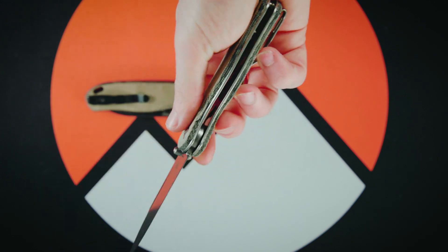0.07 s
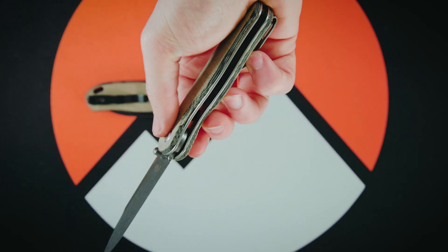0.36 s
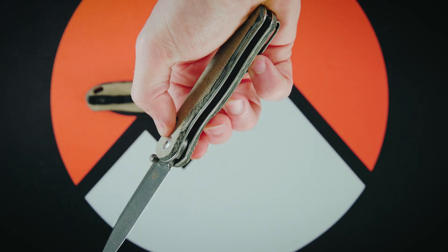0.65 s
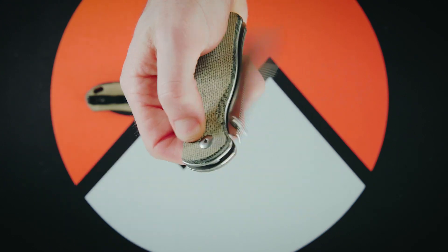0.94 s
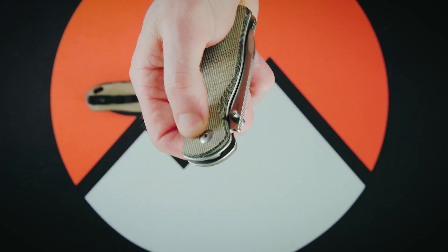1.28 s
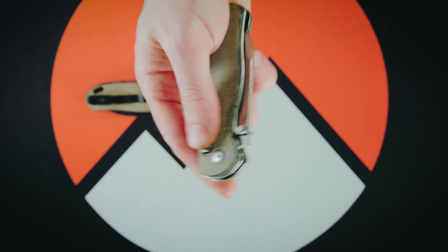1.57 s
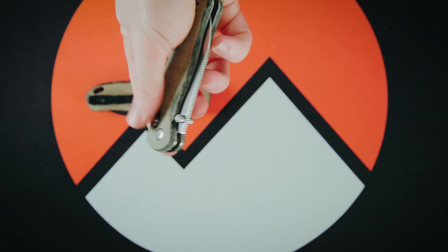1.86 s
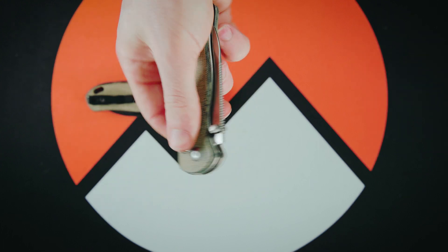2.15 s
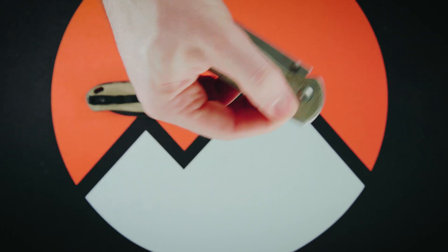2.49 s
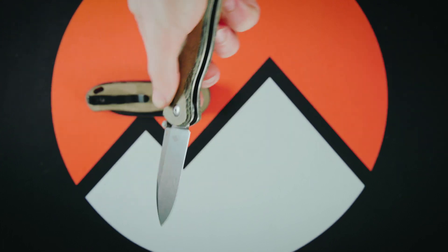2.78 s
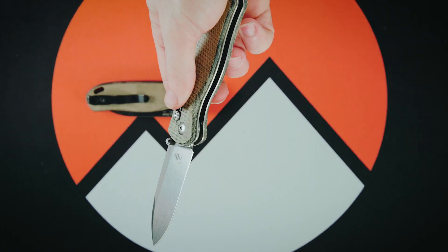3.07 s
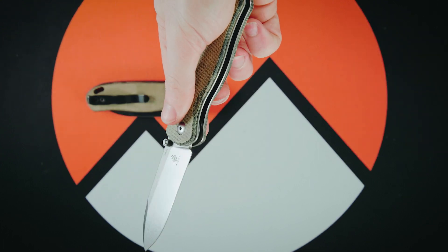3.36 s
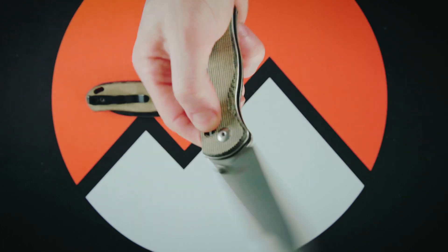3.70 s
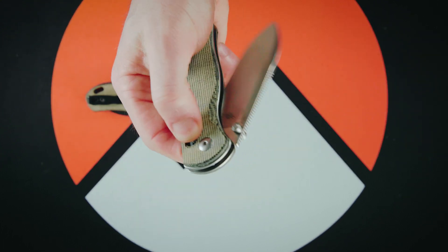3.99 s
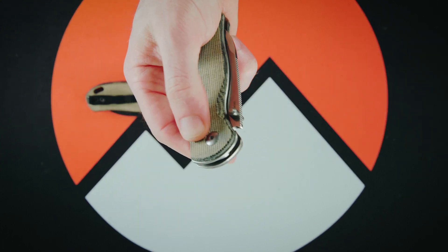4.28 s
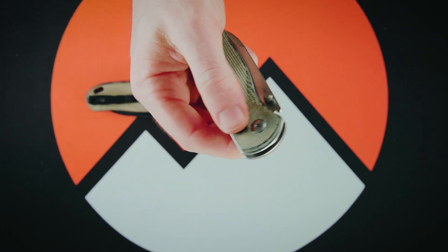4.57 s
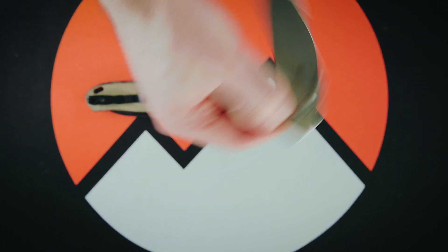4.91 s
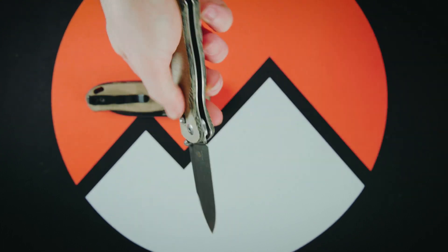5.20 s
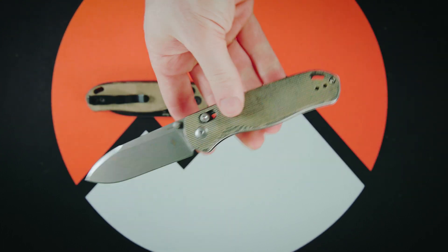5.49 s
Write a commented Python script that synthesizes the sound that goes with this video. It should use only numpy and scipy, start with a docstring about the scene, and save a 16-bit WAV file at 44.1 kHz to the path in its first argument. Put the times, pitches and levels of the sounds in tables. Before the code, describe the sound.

A folding knife is twice swung shut with rattling steel clicks and flicked open with a sharp snap, close up in a small room.

```python
"""A small, live room with ventilation humming; a folding knife is worked over a desk, close to the mic.
Twice the lock bar is pulled back, the blade swings shut and rattles in the handle, then it is flicked open
and snaps against its stop pin, bouncing. Each contact is a few ms of steel chatter, coloured by the
knife's resonances. Fingers rub the grip and the pivot squeaks faintly. The desk returns one early
reflection, the room a short tail, and the hardest snaps overload the microphone input."""
import sys
import numpy as np
from scipy import signal
from scipy.fft import rfft, irfft
from scipy.io import wavfile
from scipy.ndimage import uniform_filter1d

SR = 44100
rng = np.random.default_rng(int(sys.argv[2]) if len(sys.argv) > 2 else 0)


def store_wav(level_fs):
    """Save 16-bit WAV to argv[1]."""
    pcm = np.round(np.clip(np.atleast_2d(level_fs), -1, 1) * 32767)
    wavfile.write(sys.argv[1], SR, pcm.T.astype(np.int16))


N = 249165

# spectrum of the ventilation's air noise: frequency_hz, relative_db
AIR_COLOUR = [(15, -66.5), (25, -38.5), (43, -17), (55, -5), (76, -3), (97, -15), (137, -5), (170, -17),
              (326, -17), (373, -29.5), (416, -17.5), (451, -24), (2840, -39), (7510, -38), (16000, -45)]
# ventilation drones: pitch_hz, width_hz, level_db
VENT_DRONES = [(71.73, 3.3, -55), (121.4, 7, -63), (268, 36, -63.5), (335.2, 18, -66.5)]
# colour of the reverberation against the direct sound: frequency_hz, gain_db
REVERB_COLOUR = [(200, -6), (1000, 5), (2500, 1), (4700, 2.5), (6500, -2), (8500, -3.5), (12000, -0.5),
                 (15000, 0.5)]
# decay of the room: frequency_hz, t60_s
REVERB_DECAY = [(200, 0.47), (800, 0.8), (2100, 0.57), (4700, 0.64), (6600, 0.59), (9000, 0.47),
                (15000, .4)]
# skin on the grip and lock bar: start_s, length_s, level_db
FINGER_RUBS = [(0, 0.048, -63.5), (1.279, 0.027, -44), (1.684, 0.094, -62.5), (2.064, 0.16, -64),
               (2.474, 0.043, -45.5), (3.526, 0.13, -59), (4.764, .035, -59.5), (4.792, 0.0287, -50.5),
               (5.482, 0.021, -61), (5.573, 0.062, -64)]
# spectrum of rubbing: frequency_hz, relative_db
FRICTION_COLOUR = [(200, -19), (1000, -8.5), (2500, -8.5), (5000, 0.5), (7500, -0.5), (11000, -6),
                   (16000, -22)]
# the pivot starts to turn: start_s, length_s, pitch_hz, width_hz, level_db
PIVOT_SQUEAKS = [(2.61, 0.024, 5700, 354, -69), (3.542, 0.052, 4850, 600, -60.5),
                 (3.637, 0.038, 2250, 111, -62)]
# the handle jolts in the palm: start_s, level_db, pitch_hz, t60_s
HANDLE_JOLTS = [(.9490, -31, 136, 0.036), (1.322, -38, 300, 0.0096), (2.6403, -14.5, 733, 0.0067),
                (4.888, -51, 1000, 0.015), (4.985, -31, 1060, 0.013)]
# broad colour of a steel contact: frequency_hz, gain_db
STEEL_COLOUR = [(150, -22.5), (500, -23.5), (1200, -18.5), (2200, -14), (3400, -10.5), (5000, -9),
                (7500, -2), (10000, -8), (13000, -17.5), (15500, -24.5)]
# resonances of the folded knife: pitch_hz, width_hz, mic_lift_db, room_lift_db
FOLDED_RESONANCES = [(2750, 970, 3.5, 4.5), (4395, 590.0, 4.5, 5), (6280, 750, 4, 0.5),
                     (7680.0, 510, 2.5, -4.5), (9530, 920.0, 0.5, 2), (11000, 870.0, 4.5, 5),
                     (14670, 540.0, 5, 5.5)]
# resonances of the open knife: pitch_hz, width_hz, mic_lift_db, room_lift_db
OPEN_RESONANCES = [(2266, 890, 4.5, 6), (4613, 590, 8.5, 7.5), (6210, 1100, 6, 7), (7470, 630, 3.5, 6),
                   (9270, 500, 6, 1.5), (12080, 1200, 11.5, 7), (14650, 750, 14, -2)]
# light touches of nail and thumb stud: start_s, strength_db, tilt_db_per_octave
NAIL_TICKS = [(0.2032, -24, -10.5), (0.268, -21.5, -6), (1.664, -20, 1), (2.448, -20, 0),
              (2.4735, -11, 0.5), (2.5049, -9.5, -2.5), (3.5496, -20, -5.5), (3.643, -21, -2),
              (4.8225, -11.5, -5), (4.8876, -14.5, -9), (4.943, -21.5, 3.5), (4.979, -9, -2)]
# the lock bar slips over the tang: start_s, strength_db
LOCK_PINGS = [(1.2733, -14.5), (1.289, -14), (4.1857, -16), (4.202, -9.5), (4.212, -10)]
# the loose blade hits lock and handle: start_s, strength_db, knock_db, edge_db, ring_hz, ring_db
BLADE_RATTLES = [(0.9474, 14, -3.5, -2, 9000, 9), (1.0514, 3, 4, -1.5, 4400, 8),
                 (1.087, -6.5, 6.5, -11, 5600, 12), (1.2924, 8, -8.5, -16, 4460, 3.5),
                 (1.3119, 10.5, -6.5, -8.5, 7660, 4), (3.8493, 12.5, -1.5, 1, 8950, 4.5),
                 (4.0502, 9, 0.5, -2, 6100, 10), (4.1345, -5.5, 10.5, 4, 6200, 5),
                 (4.215, 9.5, -2, 7, 7000, 7), (4.816, -4, 0.5, -4, 6460, 7)]
# the lock bar is pulled back, later seats: start_s, strength_db, knock_db, edge_db, ring_db, room_db
LOCK_CLICKS = [(0.4303, 17, -13, -11.5, -17.5, -10.5), (2.7561, 15.5, 2.5, -2.5, 11.5, -17)]
# the blade hits its stop pin: start_s, strength_db, first_bounce_gap_s, knock_db, ring_hz, ring_db
BLADE_SNAPS = [(2.641, 25, .011, 0, 7000, 3), (4.9833, 23, .0121, 1, 6660, 4.5)]

BLADE_HZ, BLADE_WIDTH_HZ = 6700, 1700   # the band in which the blade itself rings
TOP_HZ = 15800


def from_db(db):
    """Decibels to gain."""
    return 10 ** (np.asarray(db) / 20)


def at_hz(points, hz):
    """Read a table on a log-frequency axis."""
    table_hz, value = np.transpose(points)
    return np.interp(np.log(np.maximum(hz, 1)), np.log(table_hz), value)


def bins(size):
    """Frequencies of a spectrum of that many samples."""
    return np.fft.rfftfreq(size, 1 / SR)


def bell(hz, centre, width):
    """Resonance curve of height 1."""
    return 1 / (1 + (2 * (hz - centre) / width) ** 2)


def cluster(hz, centre, width):
    """Several close modes merge into a flat-topped hump of height 1."""
    return 1 / (1 + (2 * (hz - centre) / width) ** 4)


def coloured(x, gain):
    """Shape the spectrum of x and scale it to rms 1."""
    shaped = irfft(rfft(x) * gain, len(x))
    return shaped / np.sqrt(np.mean(shaped ** 2) + 1e-20)


def minimum_phase(colour_db):
    """Causal response with that colour: nothing rings before the blow."""
    cepstrum = irfft(np.log(from_db(colour_db)))
    half = len(cepstrum) // 2
    cepstrum[1:half] *= 2
    cepstrum[half + 1:] = 0
    return np.exp(rfft(cepstrum))


def add(track, start_s, sound):
    """Mix a sound in at a time."""
    at = max(round(start_s * SR), 0)
    track[at:at + len(sound)] += sound[:max(N - at, 0)]


def ventilation(air_db=-53.5, low_cut_hz=25):
    """Room tone: soft air noise with a few narrow, wavering drones."""
    hz = bins(N)
    low_cut = hz ** 2 / np.hypot(hz ** 2, low_cut_hz ** 2)
    out = from_db(air_db) * coloured(rng.standard_normal(N), low_cut * from_db(at_hz(AIR_COLOUR, hz)))
    for pitch_hz, width_hz, db in VENT_DRONES:
        out += from_db(db) * coloured(rng.standard_normal(N), low_cut * bell(hz, pitch_hz, width_hz))
    return out


def room(x, gap_s=0.0074, build_s=0.011, size=40000, bands=18):
    """Diffuse reflections build up after a short gap and die away, the high treble first."""
    t, hz = np.arange(size) / SR, bins(size)
    spectrum = rfft(rng.standard_normal(size)) * from_db(at_hz(REVERB_COLOUR, hz))
    build = 1 - np.exp(-np.maximum(t - gap_s, 0) / build_s)
    centres, tail = np.geomspace(200, TOP_HZ, bands), 0
    for centre, share in zip(centres, np.eye(bands)):
        band = irfft(spectrum * np.interp(hz, centres, share))
        fade = build * from_db(-60 * t / at_hz(REVERB_DECAY, centre))
        tail += band * fade / np.linalg.norm(fade)
    return signal.fftconvolve(x, tail)[:N]


def desk(x, delay_s=0.0087, gain_db=-15.5):
    """The hard desk top sends one early reflection to the mic."""
    out = np.zeros(N)
    add(out, delay_s, from_db(gain_db) * x)
    return out


def friction(slips_per_s=2500, spread_db=3.5, swing_s=0.16, swing_from_db=-71, swing_to_db=-52.5):
    """Tiny, uneven slips: skin rubs the knife, and the pivot slides ever faster before each snap."""
    envelope = np.zeros(N)
    for start_s, length_s, db in FINGER_RUBS:
        add(envelope, start_s, from_db(db) * signal.windows.tukey(int(length_s * SR), 0.5))
    swing = from_db(np.linspace(swing_from_db, swing_to_db, int(swing_s * SR)))
    for snap_s, *_ in BLADE_SNAPS:
        add(envelope, snap_s - swing_s, swing)
    slips = (rng.random(N) < slips_per_s / SR) * rng.choice([-1, 1], N)
    sizes = from_db(spread_db * np.minimum(rng.exponential(1, N), 4))
    return envelope * coloured(slips * sizes, from_db(at_hz(FRICTION_COLOUR, bins(N))))


def pivot_squeaks():
    """Sliding steel briefly sings in one narrow resonance."""
    out = np.zeros(N)
    for start_s, length_s, pitch_hz, width_hz, db in PIVOT_SQUEAKS:
        size = int(length_s * SR)
        squeak = coloured(rng.standard_normal(size), bell(bins(size), pitch_hz, width_hz))
        add(out, start_s, from_db(db) * signal.windows.tukey(size, 0.5) * squeak)
    return out


def handle_jolts(size=4096):
    """The handle recoils into the palm: a quickly damped swing."""
    out, t = np.zeros(N), np.arange(size) / SR
    for start_s, db, pitch_hz, t60_s in HANDLE_JOLTS:
        add(out, start_s, -from_db(db - 60 * t / t60_s) * np.sin(2 * np.pi * pitch_hz * t))
    return out


def contact(t60_s, modes, colour_db, size=4096, smooth_hz=600, room_ripple=0.28):
    """Steel chatters on steel, damped by the hand; returns the sound at the mic and into the room."""
    t, hz = np.arange(size) / SR, bins(size)
    chatter = rfft(rng.standard_normal(size) * from_db(-60 * t / t60_s))
    # a hard contact excites all bands alike, leaving only a fine ripple
    smooth_power = uniform_filter1d(np.abs(chatter) ** 2, int(smooth_hz * size / SR))
    flatten_db = -10 * np.log10(smooth_power + 1e-12)
    ripple_db = 20 * np.log10(np.abs(chatter) + 1e-6) + flatten_db
    broad_db = at_hz(STEEL_COLOUR, hz) + colour_db(hz)
    mic_db = broad_db + sum(db * cluster(hz, pitch, width) for pitch, width, db, _ in modes)
    room_db = broad_db + sum(db * cluster(hz, pitch, width) for pitch, width, _, db in modes)
    to_mic = irfft(chatter * minimum_phase(mic_db + flatten_db))
    # the room gathers sound from all sides of the knife, which smooths the ripple
    to_room = irfft(minimum_phase(room_db + room_ripple * ripple_db))
    return to_mic, to_room


def touch(t60_s, tilt_db, ping_db=0, ping_hz=8000, ping_width_hz=870, blade_share=0.68):
    """A light contact on the folded knife, tilted in dB per octave; a ping also lifts the blade's band."""
    def colour_db(hz):
        octaves = np.log2(np.maximum(hz, 900) / BLADE_HZ)   # no tilt below 900 Hz
        soft_top_db = -10 * np.log10(1 + (hz / 11000) ** 6)
        ping = cluster(hz, ping_hz, ping_width_hz) + blade_share * cluster(hz, BLADE_HZ, ping_width_hz)
        return tilt_db * octaves + soft_top_db + ping_db * ping
    return contact(t60_s, FOLDED_RESONANCES, colour_db)[0]


def nail_ticks():
    """Nail and thumb stud tick lightly, duller when a finger takes part."""
    out = np.zeros(N)
    for start_s, db, tilt_db in NAIL_TICKS:
        add(out, start_s, from_db(db) * touch(t60_s=0.018, tilt_db=tilt_db))
    return out


def lock_pings():
    """The lock bar pings as it slips over the tang, just before the blade is home."""
    out = np.zeros(N)
    for start_s, db in LOCK_PINGS:
        add(out, start_s, from_db(db) * touch(t60_s=0.033, tilt_db=-4, ping_db=14))
    return out


def knock_and_edge(hz, knock_db, edge_db, knock_below_hz=3300, edge_above_hz=10030):
    """Two shelves in dB: the handle's knock fills out the lows, a harder contact sharpens the top."""
    lows = 1 / (1 + (hz / knock_below_hz) ** 4)
    highs = 1 - 1 / (1 + (hz / edge_above_hz) ** 12)
    return knock_db * lows + edge_db * highs


def blow(start_s, db, room_db, t60_s, modes, colour_db):
    """One contact at its time and strength, on two tracks: to the mic and into the room."""
    tracks = np.zeros((2, N))
    to_mic, to_room = contact(t60_s, modes, colour_db)
    add(tracks[0], start_s, from_db(db) * to_mic)
    add(tracks[1], start_s, from_db(db + room_db) * to_room)
    return tracks


def blade_rattles(t60_s=0.02, room_db=-10, ring_width_hz=1400, grip_loss_db=2.5):
    """The loose blade strikes lock and handle, damped by the hand; its angle picks the resonance."""
    out = np.zeros((2, N))
    for start_s, db, knock_db, edge_db, ring_hz, ring_db in BLADE_RATTLES:
        def colour_db(hz):
            ring = ring_db * bell(hz, ring_hz, ring_width_hz)
            grip = grip_loss_db * bell(hz, BLADE_HZ, BLADE_WIDTH_HZ)
            return knock_and_edge(hz, knock_db, edge_db) + ring - grip
        out += blow(start_s, db, room_db, t60_s, FOLDED_RESONANCES, colour_db)
    return out


def lock_clicks(t60_s=0.019, spring_db=6):
    """The lock bar clicks and its spring rings; the blade hardly rings on release, but hard on seating."""
    out = np.zeros((2, N))
    for start_s, db, knock_db, edge_db, ring_db, room_db in LOCK_CLICKS:
        def colour_db(hz):
            ring = ring_db * bell(hz, centre=6564, width=930)
            spring = spring_db * bell(hz, centre=5050, width=680)
            return knock_and_edge(hz, knock_db, edge_db) + ring + spring
        out += blow(start_s, db, room_db, t60_s, OPEN_RESONANCES, colour_db)
    return out


def blade_snaps(t60_s=0.015, room_db=-5, edge_db=1.5, ring_width_hz=820,
                gap_ratio=0.44, bounce_loss_db=9, bounce_ring_db=7):
    """The blade hits the stop pin and bounces twice, each time sooner, weaker and with more ring left."""
    out = np.zeros((2, N))
    for start_s, db, gap_s, knock_db, ring_hz, ring_db in BLADE_SNAPS:
        for bounce in range(3):
            def colour_db(hz):
                ring = (ring_db + bounce * bounce_ring_db) * bell(hz, ring_hz, ring_width_hz)
                return knock_and_edge(hz, knock_db, edge_db) + ring
            out += blow(start_s, db - bounce * bounce_loss_db, room_db, t60_s, OPEN_RESONANCES, colour_db)
            start_s += gap_s * gap_ratio ** bounce
    return out


def scene(handling_room_db=-11):
    """One microphone: the knife close up, with desk, room and ventilation behind it."""
    to_mic, to_room = blade_snaps() + lock_clicks() + blade_rattles()
    handling = nail_ticks() + lock_pings() + friction()
    direct = to_mic + handling + handle_jolts() + pivot_squeaks()
    reverb = room(to_room + from_db(handling_room_db) * handling)
    return (direct + desk(direct) + reverb + ventilation())[None]


def record(dry, ceiling=0.75, rumble_hz=35):
    """The hardest snaps overload the mic input; rumble and the top are cut."""
    clipped = dry / (1 + (dry / ceiling) ** 4) ** (1 / 4)
    low_cut = signal.butter(2, rumble_hz, "high", fs=SR, output="sos")
    high_cut = signal.ellip(10, 0.1, 80, TOP_HZ, fs=SR, output="sos")
    return signal.sosfilt(high_cut, signal.sosfilt(low_cut, clipped))


dry = scene()
out = record(dry)
store_wav(out)
```